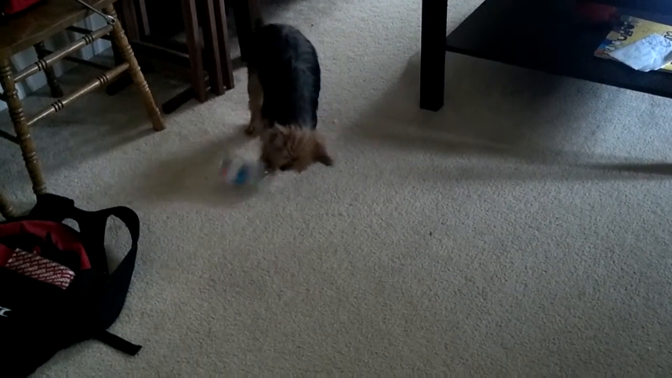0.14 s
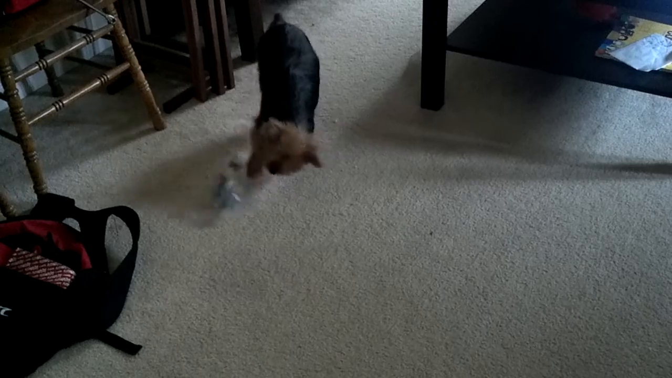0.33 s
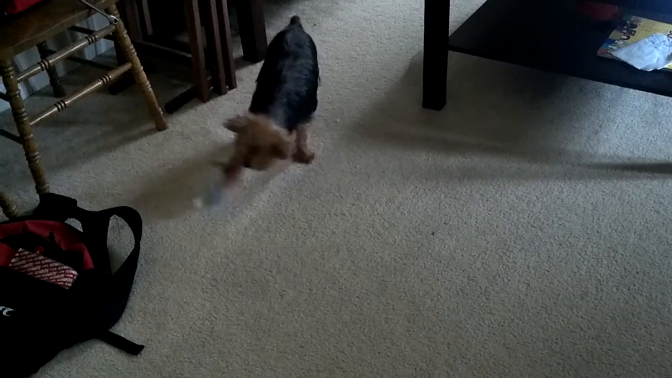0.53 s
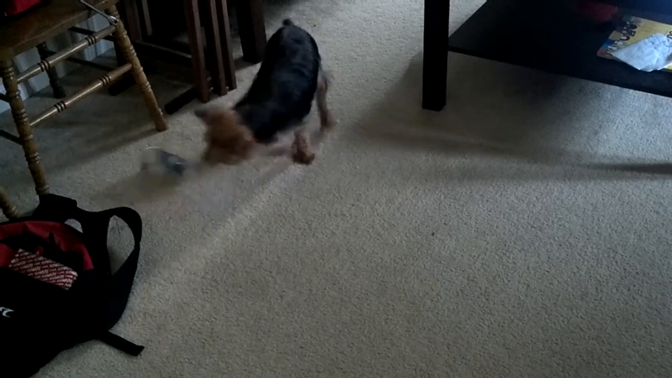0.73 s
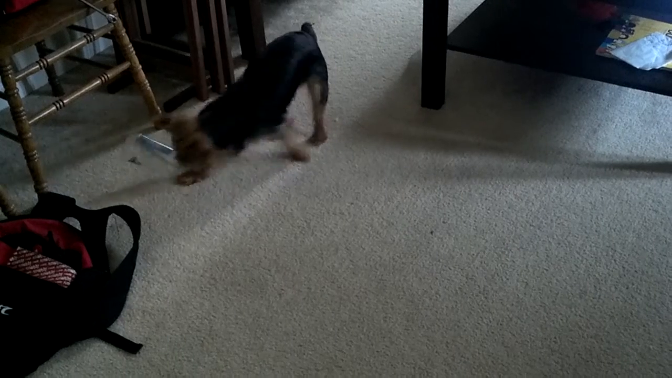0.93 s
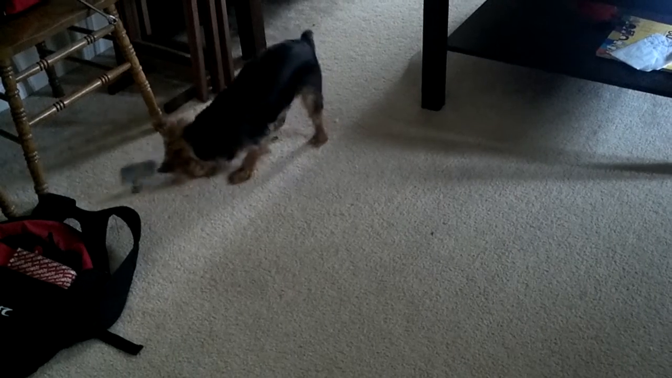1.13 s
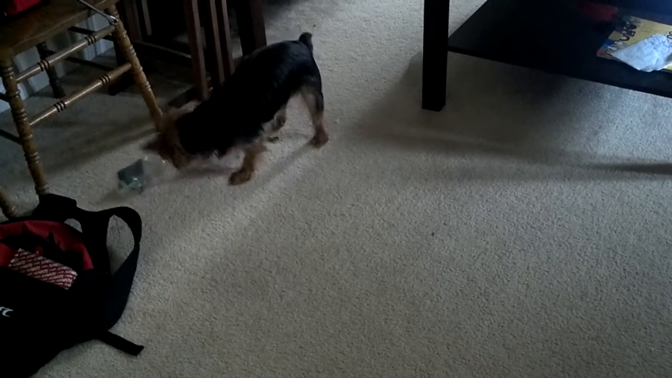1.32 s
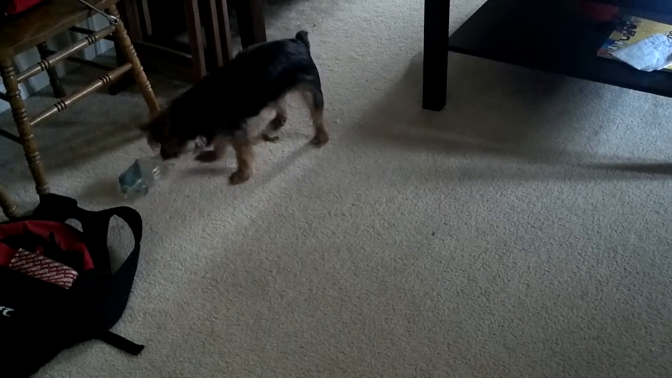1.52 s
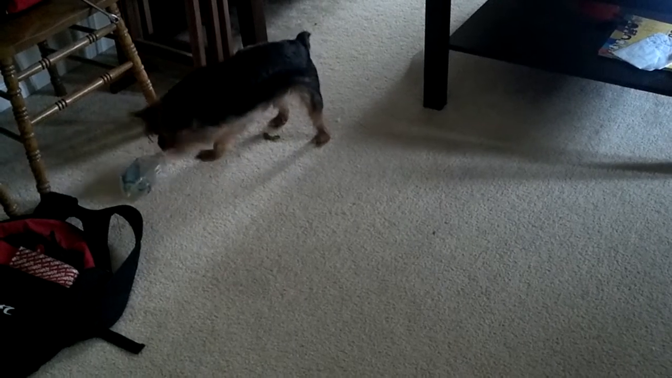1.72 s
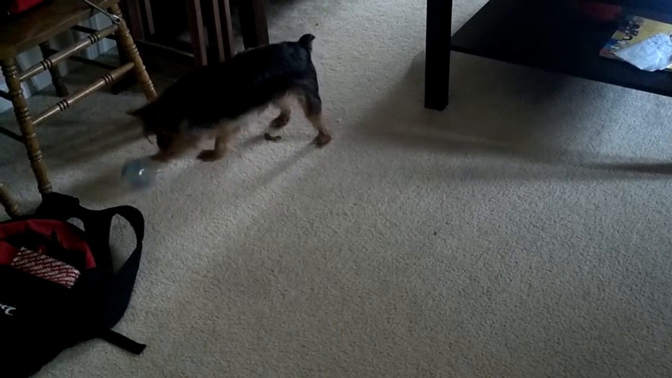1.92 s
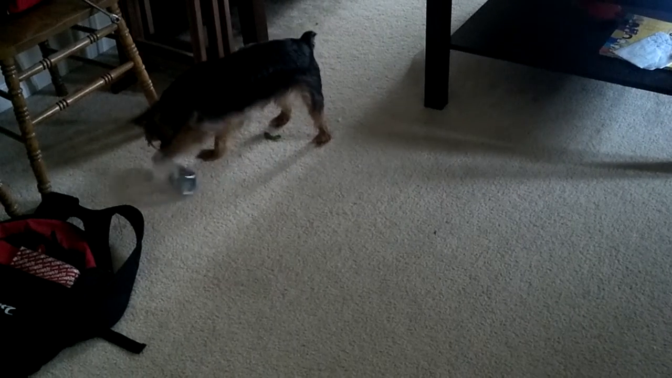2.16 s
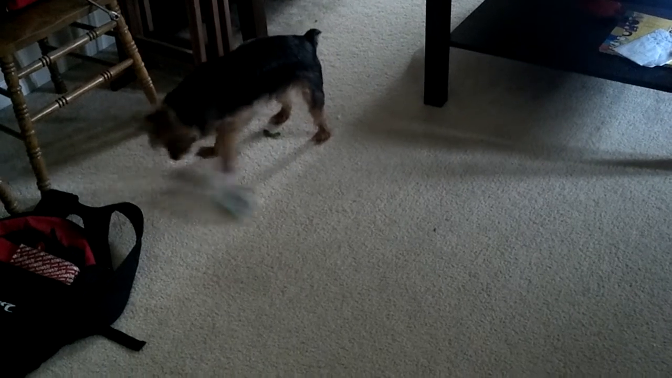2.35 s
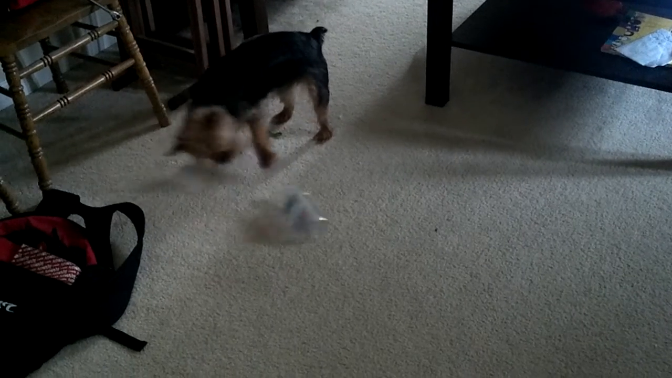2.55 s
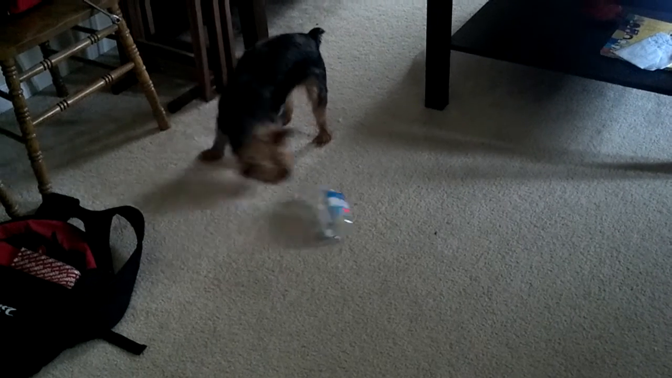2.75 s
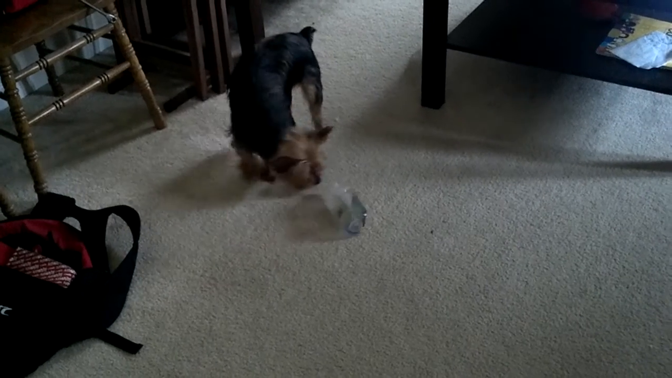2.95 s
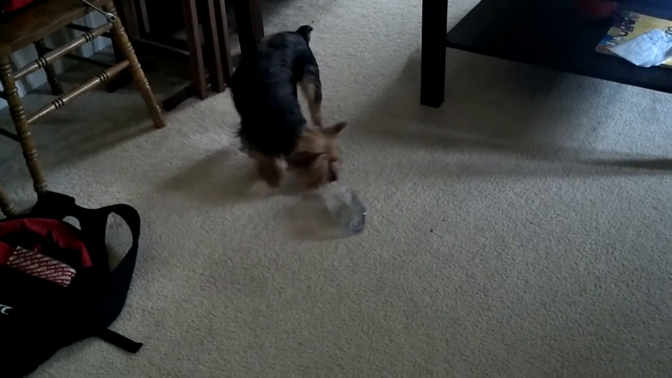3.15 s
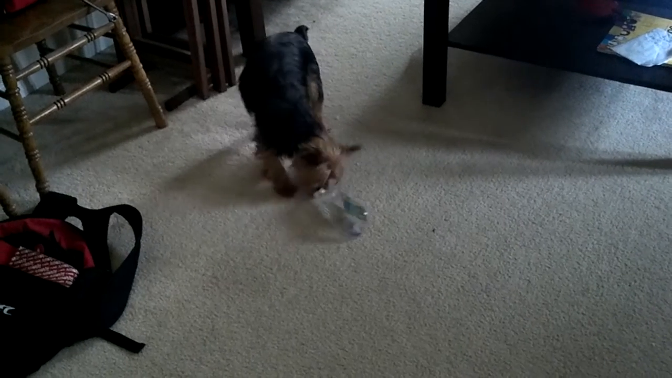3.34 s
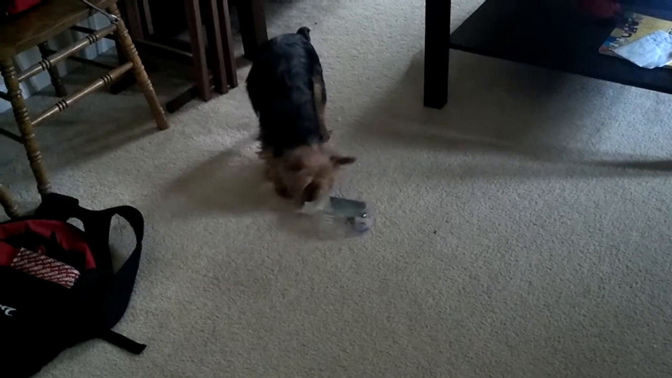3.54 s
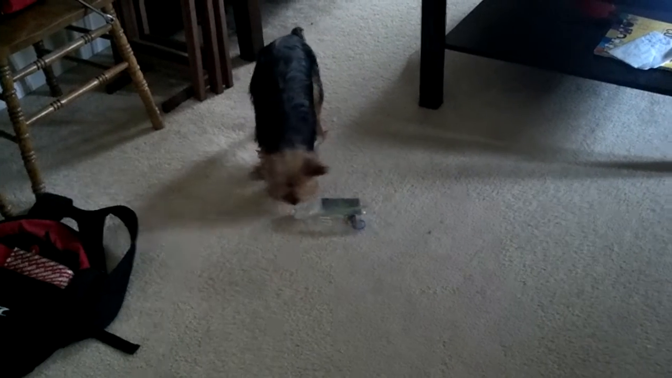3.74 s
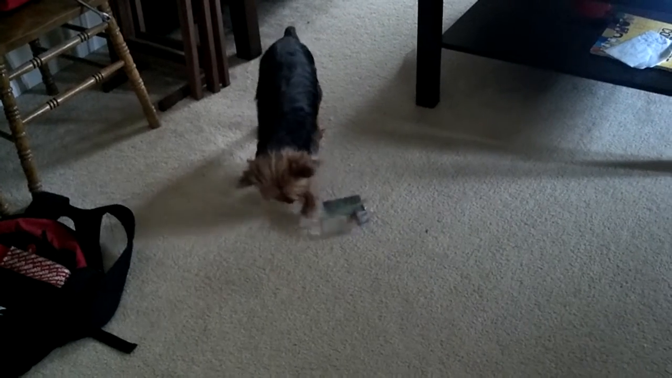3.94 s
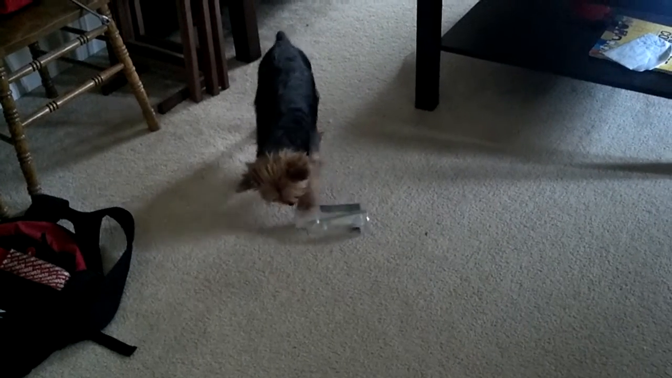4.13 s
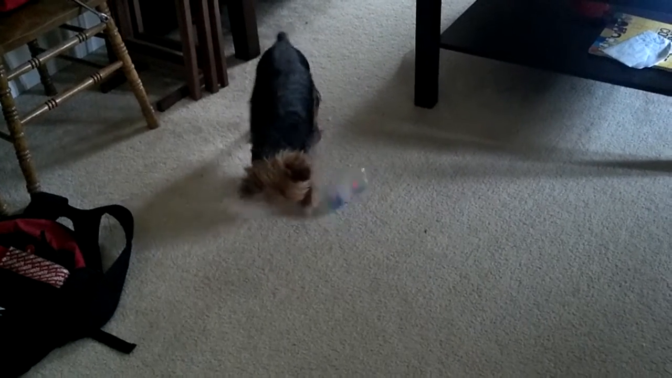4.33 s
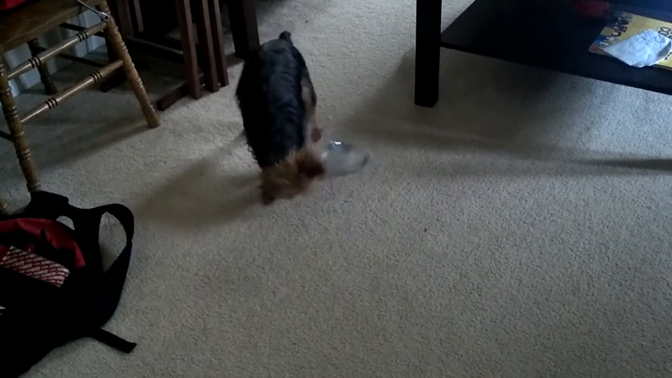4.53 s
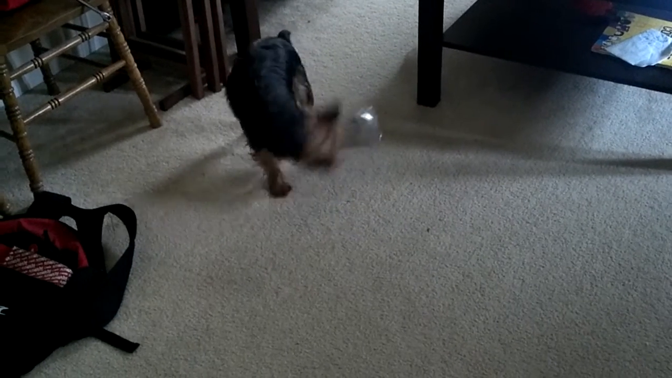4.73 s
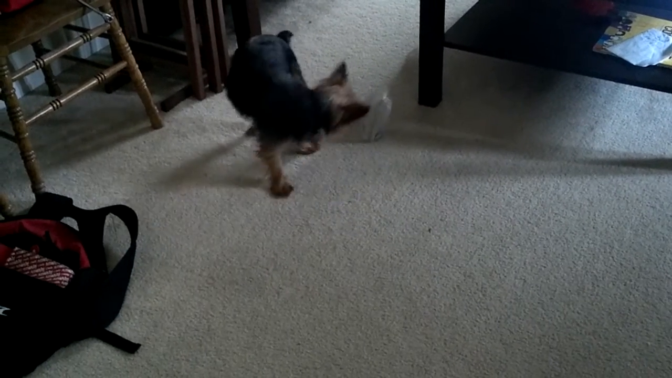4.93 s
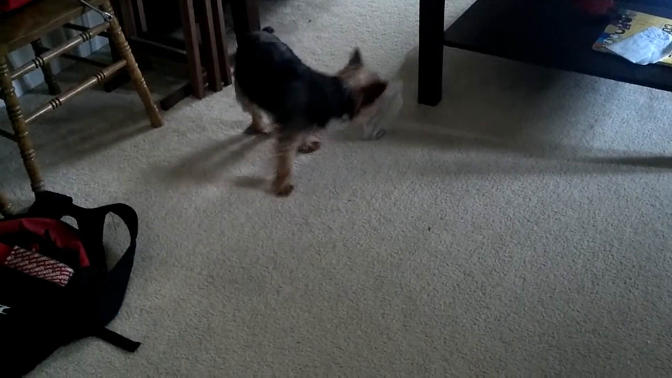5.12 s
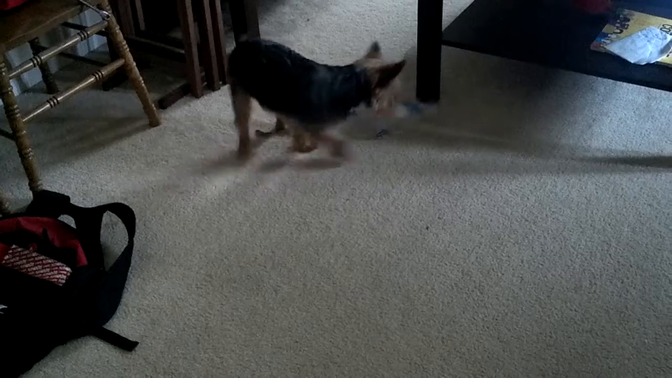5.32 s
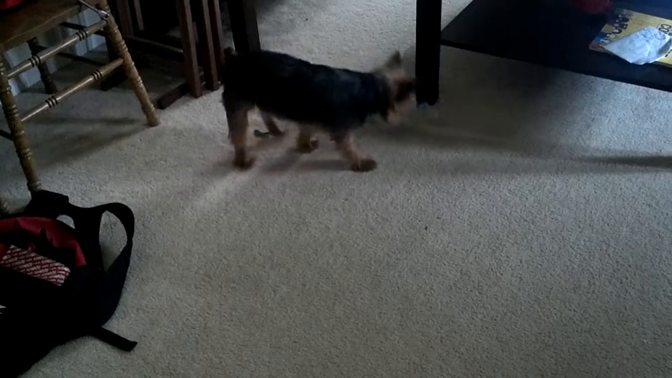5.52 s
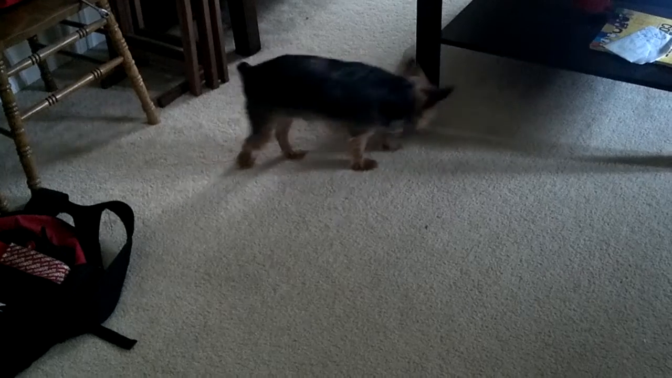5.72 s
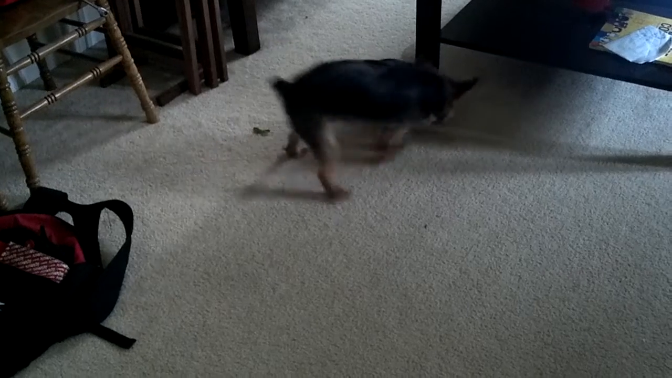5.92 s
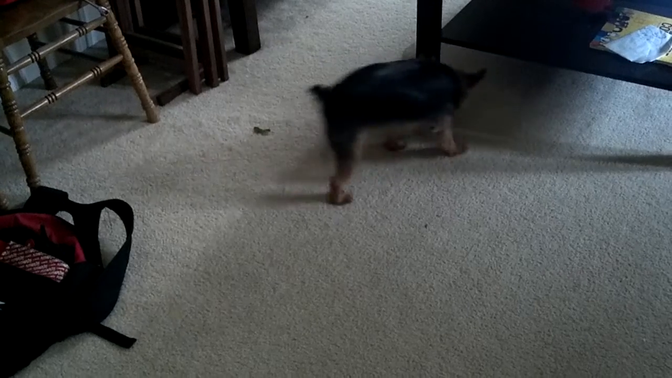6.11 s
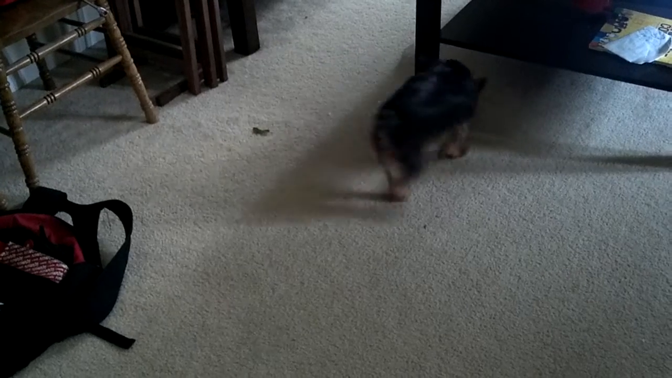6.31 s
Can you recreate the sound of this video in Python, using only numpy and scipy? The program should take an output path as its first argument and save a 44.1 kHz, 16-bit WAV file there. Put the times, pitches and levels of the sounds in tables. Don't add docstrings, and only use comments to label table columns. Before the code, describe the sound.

An empty plastic bottle is squeezed, knocked and shoved across carpet in irregular bouts: brittle crackling, hard clicks, short hollow booms and brief film-like label rustle. Small metal tags chink faintly, once brightly near the end. The strongest bouts fall in the first two and a half seconds and just after four. Small indoor room, short reverberation, nearby wide stereo microphones with hiss and motor whine.

```python
import sys
import numpy as np
from scipy import signal
from scipy.fft import rfft, irfft, next_fast_len
from scipy.io import wavfile
from scipy.ndimage import uniform_filter1d

SR = 44100
rng = np.random.default_rng(int(sys.argv[2]) if len(sys.argv) > 2 else 0)


def to_wav(s):
    ch = np.atleast_2d(s).T
    pcm = np.round(np.clip(ch, -1, 1) * 32767)
    wavfile.write(sys.argv[1], SR, pcm.astype(np.int16))


def undo_db(level):
    steps = np.asarray(level, float) / 20
    return 10 ** steps


N = 280455

# frequency in Hz, level in dB, t60 in s.
BODY_MODES = [(337, -3, 0.05), (388.5, 10, 0.12), (564.4, 4.5, 0.11), (630, 2, 0.1), (674, 7, 0.05),
              (796.3, 14.5, 0.033)]
# frequency in Hz, level in dB, t60 in s.
PANEL_MODES = [(1146, -10, 0.062), (1430, -69, 0.075), (1617, -3, 0.044), (1915, -16, 0.07),
               (2520, -0.5, 0.032), (3127, -1, 0.013), (4450, 15, 0.00046)]
# frequency in Hz, level in dB.
WALL_DB = [(500, -16.5), (1050, 5.5), (1600, 8), (2500, 10.5), (3500, 1.5), (4800, -4), (7000, -27.5)]
# frequency in Hz, level in dB.
CRACK_DB = [(2500, 5.5), (4200, 2), (6500, 12), (9000, 2), (12000, 0), (16000, -0.5)]


def evened(x):
    return x / np.sqrt(np.mean(x ** 2) + 1e-20)


def peak_one(x):
    return x / abs(x).max()


def read(points, hz):
    f, value = np.transpose(points)
    return np.interp(np.log(hz + 1), np.log(f + 1), value)


def add(mix, s, sound):
    part = mix[round(s * SR):][:len(sound)]
    part += sound[:len(part)]


def coloured(x, points):
    size = next_fast_len(x.shape[-1])
    gain = undo_db(read(points, np.fft.rfftfreq(size, 1 / SR)))
    return irfft(rfft(x, size) * gain, size)[..., :x.shape[-1]]


def ring(modes, t, jitter_db=0., detune=1.):
    hz, db, t60 = np.transpose(modes)[..., None]
    decay = undo_db(db + jitter_db - 60 * t / t60)
    return (decay * np.sin(2 * np.pi * hz * detune * t)).sum(0)


def swing_up(t, rise_s):
    return 1 - np.exp(-t / rise_s)


def ports(common, differing):
    return np.array([common + differing, common - differing])


def background():
    # frequency in Hz, density in dB per Hz.
    common_db = [(30, -88), (60, -87.5), (110, -77.5), (170, -83), (370, -85.5), (540, -90.5),
                 (800, -102.5), (1500, -101), (3300, -105), (5000, -109), (7000, -106), (16000, -107)]
    # frequency in Hz, density in dB per Hz.
    differing_db = [(30, -104), (60, -97), (120, -89), (370, -90.5), (540, -95), (800, -97), (1500, -102),
                    (3300, -105), (5000, -109), (7000, -106), (16000, -106)]
    # time in s, frequency in Hz.
    whine_hz = [(0, 3035), (3, 3070), (5, 3125), (6.36, 3130)]
    # multiple of the pitch, level in dB.
    whine_db = [(1, -66.5), (2, -68), (3, -57.5)]
    # frequency in Hz, level in dB.
    hum = [(120, -56), (6900, -79.5), (9860, -118)]
    # start in s, frequency in Hz, level in dB.
    far_whistle = (6.19, 1400, -74)
    t = np.arange(N) / SR
    noise = rng.standard_normal((2, N)) * np.sqrt(SR / 2)
    out = ports(coloured(noise[0], common_db), coloured(noise[1], differing_db))
    flutter, swell = uniform_filter1d(uniform_filter1d(rng.standard_normal((2, N)), size=40), size=40)
    turns = np.cumsum(np.interp(t, *np.transpose(whine_hz)) + 55 * evened(flutter)) / SR
    for multiple, db in whine_db:
        tone = (1 + 0.23 * evened(swell)) * np.cos(2 * np.pi * round(multiple) * turns)
        out += undo_db(db) * tone * np.array([[1], [.25]])
    for hz, db in hum:
        out += undo_db(db) * np.sin(2 * np.pi * hz * t)
    s, hz, db = far_whistle
    level = undo_db(db) * np.clip((t - s) / 0.034, 0, 1) * (1 + 0.49 * np.sin(2 * np.pi * 14 * t))
    return out + level * np.sin(2 * np.pi * hz * t)


def free_mode_hz(s):
    # time in s, free mode in Hz.
    grip = [(0, 507), (0.21, 730), (0.33, 563), (0.47, 820), (0.6, 493), (0.86, 660), (1.3, 750),
            (1.95, 626), (2.13, 596), (2.18, 330), (2.24, 600), (2.27, 380), (2.31, 791), (2.44, 572),
            (2.57, 605), (2.62, 680), (2.9, 640), (3.9, 718), (4.45, 761), (4.65, 630), (4.88, 740),
            (5.02, 400), (5.06, 635), (5.45, 740), (5.6, 685)]
    return np.interp(s, *np.transpose(grip))


def grip_db(mode_hz, free_hz):
    return -np.minimum(22 * abs(np.log2(mode_hz / free_hz)), 10.5)


def handling():
    # start in s, level in dB, fade in s,
    # wall relative level in dB, brightness in dB.
    shoves = [(0, -35.5, 0.12, 4.5, -2), (.49, -37, 0.27, -13, -8), (.6, -35.5, 1, -7.5, -21),
              (1.31, -38.5, 0.22, -2.5, -17), (2.14, -31, 0.28, -26, -28), (2.48, -35.5, 0.2, -2.5, -18),
              (2.58, -34, 0.27, -0.5, -16), (2.93, -41, 0.64, -12, -16), (3.98, -35, 0.15, -21, -6),
              (4.055, -35, 0.1, -19, -13), (4.32, -30, 0.41, -8, -14.5), (4.62, -30, 0.071, -6, -18),
              (5.58, -47, 0.91, -3, -23)]
    # top in s, level in dB, swell and fade in s,
    # wall relative level in dB, brightness in dB.
    squeezes = [(0.33, -40, 0.18, 0.5, -12), (.9, -31, 0.045, -1, -14), (1.08, -40, 0.032, -2.5, -13),
                (1.188, -38.5, 0.13, -2, -9.5), (1.86, -40, 0.033, -21, -7.5), (1.99, -41.5, 0.14, -2, -3),
                (2.208, -36, 0.12, -.6, -9.5), (2.35, -40, 0.31, -1, -12), (3.87, -62, 0.35, -2, -0.5),
                (4.22, -35.5, 0.12, 0.5, -13), (4.77, -47.5, 0.85, 0, -9), (2.01, -42.5, 0.05, 7, -3),
                (0.587, -29.5, 0.062, 0, -12), (5.62, -38, 0.05, -2, -28), (5.81, -51.5, 0.12, 4, -17),
                (3.04, -59, 0.043, -1, -1)]
    fade_speed = (1.01, 1.05, 1.1, 1.3)
    # body, panels, crackle, hiss in dB.
    rest_db = (-70, -83, -73, -76.5)
    t = np.arange(0, N / SR + .01, .002)
    speed = np.array(fade_speed)[:, None]
    power = undo_db(np.array(rest_db)[:, None] + 0 * t) ** 2
    for rows, sudden in ((shoves, True), (squeezes, False)):
        for s, db, fade_s, wall_db, bright_db in rows:
            rise_s = 0.016 if sudden else fade_s
            away = np.where(t < s, (s - t) / rise_s, (t - s) / fade_s)
            top_db = db + np.array([[0], [wall_db], [bright_db], [4.5 + 3.1 * bright_db]])
            power = power + undo_db(top_db - np.minimum(26.5 * speed * away, 200)) ** 2
    return [np.interp(np.arange(N) / SR, t, np.sqrt(p)) for p in power]


def crinkle():
    body, panels, fine, hiss = handling()
    chance, size, noise = rng.random((3, N)), rng.exponential(1, (3, N)), rng.standard_normal((3, N))
    slips_per_s = np.array([[700], [900], [1500]])
    slips = (chance < slips_per_s / SR) * undo_db(3.4 * np.minimum(size, 4)) * np.sign(noise)
    t = np.arange(8000) / SR
    free_hz = free_mode_hz(np.arange(N) / SR)
    low = np.zeros(N)
    for mode in BODY_MODES:
        low += signal.oaconvolve(slips[0] * undo_db(grip_db(mode[0], free_hz)), ring([mode], t))[:N]
    rub = slips[1] + .5 * slips[0] + 0.14 * noise[1]
    panel = evened(signal.oaconvolve(rub, ring(PANEL_MODES, t))[:N])
    mid = evened(0.067 * panel + evened(coloured(rub, WALL_DB)))
    top = evened(coloured(slips[2] + 0.68 * slips[1] + 0.9 * noise[2], CRACK_DB))
    air = evened(coloured(noise[0] + 1.3 * slips[2], [(6000, -15), (9500, -10.0), (16000, -23.0)]))
    out = undo_db(-7.5) * body * evened(low) + undo_db(-9.5) * panels * mid
    return out + undo_db(-5.5) * fine * top + undo_db(1) * hiss * air


def pops():
    # start in s, level in dB, panel in Hz, hollow relative level in dB, hollow mode in Hz.
    pop_rows = [(0.012, -38, 1580, 0, 384), (0.030, -37, 1210, -3, 350), (0.2164, -41, 1570, -6, 815),
                (0.334, -40.5, 1000, 8, 619), (0.5157, -28, 1670, -11, 706), (0.5751, -25, 1780, -17, 600),
                (0.598, -27.5, 1550, 0, 398), (0.798, -37, 1600, -8, 694), (0.810, -52, 1620, -5, 800),
                (0.878, -31, 1660, -5, 600), (0.8949, -26, 1050, -10, 594), (0.907, -31, 1100, -5, 521),
                (1.1388, -34.5, 1690, -2.5, 680), (1.172, -37, 1590, -5, 385), (1.207, -40.5, 1210, 2, 514),
                (2.001, -38, 1600, -19, 580), (2.009, -29, 1580, -25, 610), (2.018, -31.5, 1575, -18, 720),
                (2.035, -43, 1660, -12, 600), (2.156, -32, 1570, -5, 407), (2.222, -30, 1560, -2, 660),
                (2.268, -42.5, 1200, 8.5, 384), (2.4763, -24, 1620, -4, 590), (2.512, -40, 1500, -1, 580),
                (2.528, -45, 1700, 5, 583), (2.5506, -37.5, 1650, 3, 627), (2.597, -31.5, 1300, 1.5, 692),
                (2.652, -29.5, 1570, -5.5, 381), (2.8794, -41, 1400, -9, 620),
                (3.9749, -33, 1650, -20, 803), (4.2937, -32, 1510, 5.5, 778),
                (4.5686, -35, 1360, -1.5, 688), (4.8435, -39, 1600, 0.5, 640), (4.872, -41, 1120, -3, 814),
                (5.030, -40, 1710, 6, 637), (5.1283, -48.5, 1250, -5, 606), (5.7369, -42, 1210, -4, 760),
                (5.8113, -47, 1440, -10, 645), (4.122, -40, 1510, 4, 389), (1.005, -48.5, 1030, 7.5, 379)]
    pop_t60 = (.018, 0.057, 0.0072)
    out, t = np.zeros(N), np.arange(4000) / SR
    panel_t60, hollow_t60, crack_t60 = pop_t60
    grit = rng.standard_normal((len(pop_rows), len(t)))
    for (s, db, panel_hz, hollow_db, hollow_hz), noise in zip(pop_rows, grit):
        crack = (coloured(noise, CRACK_DB) + coloured(noise, WALL_DB)) * undo_db(-60 * t / crack_t60)
        hollow = ring([(hollow_hz, hollow_db, hollow_t60)], t) * swing_up(t, 0.0023)
        panel = ring([(panel_hz, 0, panel_t60)], t)
        add(out, s, undo_db(db) * ((panel + undo_db(-6.5) * peak_one(crack)) * swing_up(t, 0.00077) + hollow))
    return out


def buckles(rows, click_t60, rise_s, tail):
    out, t = np.zeros(N), np.arange(5000) / SR
    luck = rng.standard_normal((len(rows), 2, 13, 1))
    grit = rng.standard_normal((len(rows), 2, 2048))
    short_t = t[:2048]
    burst = undo_db(-60 * short_t / click_t60) + tail * undo_db(-60 * short_t / 0.037)
    burst *= swing_up(short_t, rise_s)
    body_hz = np.array(BODY_MODES)[:, :1]
    for (s, db, boom_db, crack_db, boom_hz, panel_hz), (vary, tune), noise in zip(rows, luck, grit):
        boom = ring(BODY_MODES, t, 3 * vary[:6] + grip_db(body_hz, boom_hz), 1 + 0.017 * tune[:6])
        boom += ring([(boom_hz, 3, .075)], t)
        boom *= swing_up(t, 0.003)
        panel = ring(PANEL_MODES, t, 4 * vary[6:], 1 + 0.05 * tune[6:]) + ring([(panel_hz, 4, .025)], t)
        add(out, s, undo_db(db - 2.0) * peak_one(panel * swing_up(t, rise_s)))
        add(out, s, undo_db(db + boom_db - 2.0) * peak_one(boom))
        add(out, s, undo_db(db - 0.5) * peak_one(coloured(noise[0], WALL_DB) * burst))
        add(out, s, undo_db(db + crack_db + 5.5) * peak_one(coloured(noise[1], CRACK_DB) * burst))
    return out


def snaps():
    # start in s, level in dB, boom relative
    # level in dB, crack relative level in dB.
    more_snap_rows = [(0.129, -39.5, -23, -5), (0.2072, -32.5, -5, -8), (0.353, -49, 8, -16),
                      (0.804, -45, -7, -23), (1.001, -67, 0, 12), (1.061, -39.5, -17, -7),
                      (1.1044, -43.5, 0.5, -3), (1.205, -44, -5, -25), (1.8412, -35.5, -6.5, -19),
                      (1.9346, -36.5, -7.5, -5), (2.204, -26.5, -17, -6.5), (2.324, -44, 14, -10),
                      (2.7144, -39.5, -2, 0), (2.9312, -32, -6.5, -12), (3.031, -33, -21, -13),
                      (3.212, -41.5, -31, -3), (3.3094, -46.5, -6, -14.5), (3.8925, -38, -10, -4),
                      (3.936, -40, -6, -18), (4.3822, -31.5, -25, 3.5), (4.879, -38.5, -11, 1),
                      (5.0161, -34, -7.5, -8), (5.4401, -58, 18.5, -6), (5.7752, -51, 3, -11),
                      (5.1575, -53, -27, 11), (4.6197, -28.5, -5, -2)]
    # start in s, level in dB, boom relative level in dB, boom in Hz, panel in Hz.
    dent_rows = [(0.1505, -35.5, -12, 620, 1500), (0.2438, -33, -11, 596, 1440),
                 (0.2868, -37.5, -10, 630, 1700), (0.5023, -33, -1, 760, 1610),
                 (0.5223, -25, -5.5, 696, 1650), (0.5854, -22.5, -7, 432, 1120),
                 (0.6609, -33.5, -5, 540, 1600), (0.9018, -38, -24, 640, 1090),
                 (1.1276, -34, -31, 630, 1500), (1.1493, -30, -3.5, 356, 1585),
                 (1.3907, -38, -7, 560, 1810), (2.1764, -28, 0, 292, 1330), (2.4751, -30.5, -4, 574, 1665),
                 (2.6327, -34, -3, 630, 1590), (2.9773, -34.5, -29, 557, 1520),
                 (3.0716, -34, -17, 534, 1815), (3.968, -34, -7.5, 800, 1800),
                 (4.2416, -31.5, 3, 765, 1640), (4.3294, -30, -13, 800, 1460),
                 (4.4752, -32.5, 5.5, 790, 1300), (4.6497, -50, -2, 620, 1500),
                 (4.787, -41.5, 3.5, 750, 1840), (5.5769, -30.5, -2.5, 644, 1550),
                 (5.7132, -42.5, -0.5, 756, 1230)]
    # start in s, level in dB, boom relative level in dB,
    # crack relative level in dB, panel in Hz.
    snap_rows = [(0.258, -32.5, -28, -1, 1750), (0.3138, -32, -0.5, -4, 1720),
                 (0.472, -19, -14, -10.5, 1430), (0.858, -31.5, -20, -3.5, 1610),
                 (1.2984, -24.5, -11, -9.5, 1670), (1.9636, -26.5, -33, 2.5, 1590),
                 (1.9812, -31, -20, -18, 1150), (1.993, -29.5, -13, -1, 1530),
                 (2.1338, -27, -4.5, -19, 900), (2.3091, -21, -15, -6, 1610), (2.4611, -27.5, -5, -9, 1610),
                 (2.5752, -21.5, -6, -13, 1570), (2.8953, -29, -12, -14, 1370),
                 (3.8512, -30, -24, -5, 1600), (3.981, -24, -10.5, -0.5, 1990),
                 (4.043, -20, -10.5, -8, 1510), (4.164, -25.5, -9.5, -10, 1330),
                 (4.2091, -22, -3.5, -10, 1650), (4.309, -20, 2, -10.5, 1510),
                 (4.3668, -23.5, 0, -11, 1680), (4.4423, -22.5, -11, -33, 1580),
                 (4.608, -22.5, -15, -3.5, 1630), (4.7195, -30.5, -34, -8, 1530),
                 (5.561, -33.5, 1.5, -9, 1670)]
    sharp = [(s, db, boom, crack, free_mode_hz(s), hz) for s, db, boom, crack, hz in snap_rows]
    sharp += [(*row, free_mode_hz(row[0]), 1614) for row in more_snap_rows]
    soft = [(s, db, boom, -12.5, low, hz) for s, db, boom, low, hz in dent_rows]
    quick = buckles(sharp, click_t60=.004, rise_s=.0001, tail=.27)
    return quick + undo_db(-2) * buckles(soft, click_t60=0.0023, rise_s=0.0021, tail=0.23)


def flicks():
    # start in s, level in dB, ring in Hz, sizzle relative level in dB.
    flick_rows = [(0.2199, -44, 6500, 0), (0.25, -33.5, 4000, 5), (0.3135, -37, 3940, 0),
                  (0.4708, -28, 3600, -6), (0.5011, -31, 4000, -9), (0.8679, -41, 6450, 0),
                  (1.0954, -44, 6500, 0), (1.934, -36, 3700, -2), (1.9616, -38, 6450, -3),
                  (2.2004, -31.5, 6500, 5), (2.3093, -19, 2620, -14), (2.3237, -42, 2620, -12),
                  (2.575, -41, 6600, -3), (3.802, -42, 6600, 2), (3.85, -40, 8900, -2),
                  (3.8916, -48, 9000, 0), (3.9812, -27, 9430, 5), (4.3291, -36, 3600, -2),
                  (4.3804, -32.5, 9000, 0), (4.6079, -30, 6600, 0), (1.849, -39, 6700, -1),
                  (2.168, -42, 6300, -10), (2.179, -31, 6500, -4), (0.519, -34, 3900, -8),
                  (0.528, -40, 3280, -8), (0.555, -32, 6500, -8), (0.4724, -29, 1730, -19),
                  (4.0436, -29, 3230, -14), (4.229, -36, 3200, -10), (4.7185, -27.5, 3970, -12),
                  (1.981, -33, 4000, -4), (3.9825, -21, 1950, -30)]
    flick_t60 = (0.0058, 0.0066)
    out, t = np.zeros(N), np.arange(800) / SR
    ring_t60, sizzle_t60 = flick_t60
    grit = rng.standard_normal((len(flick_rows), len(t)))
    for (s, db, hz, sizzle_db), noise in zip(flick_rows, grit):
        treble = coloured(noise, [(4000, -32), (9000, -3), (16000, -3)])
        sizzle = undo_db(db + sizzle_db) * peak_one(treble * undo_db(-60 * t / sizzle_t60))
        add(out, s, (ring([(hz, db, ring_t60)], t) + sizzle) * swing_up(t, 0.00012))
    return out


def sings():
    # start in s, level in dB, frequency in Hz, t60 in s.
    sing_rows = [(0.592, -31, 387, 0.11), (2.464, -37.5, 569, 0.32), (2.477, -37, 622.5, 0.2),
                 (2.505, -37, 563, 0.28), (2.568, -31, 630, 0.07), (4.618, -30.5, 389.6, 0.15),
                 (4.044, -38, 386, 0.12), (0.383, -47, 565, .22), (0.293, -44, 1015, .1),
                 (4.872, -42, 795, .2), (5.014, -43, 390, .08), (4.708, -46, 390, .25)]
    out, t = np.zeros(N), np.arange(12000) / SR
    for s, db, hz, t60 in sing_rows:
        add(out, s, ring([(hz, db, t60)], t) * swing_up(t, 0.0028))
    return out


def rustles():
    # start in s, level in dB, t60 in s.
    rustle_rows = [(0.506, -42, 0.23), (2.17, -49, 0.25), (4.612, -48, 0.21), (4.722, -46, 0.16),
                   (4.874, -51.5, 0.23)]
    # frequency in Hz, level in dB.
    label_db = [(2200, -28), (3200, -3), (3900, -0.5), (4600, -4), (6500, -21)]
    out, t = np.zeros(N), np.arange(10000) / SR
    grit, size = rng.standard_normal((2, len(rustle_rows), len(t)))
    for (s, db, t60), grains in zip(rustle_rows, grit * undo_db(4.6 * size)):
        add(out, s, evened(coloured(grains, label_db)) * undo_db(db - 60 * t / t60) * swing_up(t, 0.002))
    return out


def thuds():
    # start in s, level in dB, thud in Hz, bottle mode relative level in dB.
    thud_rows = [(0.585, -49.5, 163, 15), (0.675, -59.5, 179, 20.5), (0.891, -50, 152, 11),
                 (1.155, -50.5, 158, 9.5), (1.836, -52, 152, -10), (2.110, -37, 150, 3.5),
                 (2.168, -51, 176, -11), (2.24, -46.5, 139, 11.5), (2.312, -56, 162, 11),
                 (2.472, -56, 125, 16), (2.573, -47, 169, -5), (2.68, -47, 157, -12),
                 (3.979, -45.5, 159, 3), (4.207, -50, 134, -2), (4.609, -59, 132, 8),
                 (5.389, -46, 152.5, -3), (5.561, -52, 155, -9), (1.99, -49.5, 231, 5.5)]
    out, t = np.zeros(N), np.arange(8000) / SR
    for s, db, hz, upper_db in thud_rows:
        modes = [(hz, 0, .25), (301, upper_db - 0.5, .12)]
        add(out, s, undo_db(db + 3.5) * ring(modes, t) * swing_up(t, 0.011))
    return out


def tags():
    # start in s, level in dB, thick tag relative to thin in dB, split ring relative level in dB.
    chinks = [(1.095, -46, -3, -20.5), (1.1908, -47, 3.5, -25), (2.6236, -47, -4, -17),
              (2.774, -52, -5, -16), (2.861, -52, 3, -16), (3.806, -55, 5.5, -4), (3.9165, -49, -7, -25),
              (4.1054, -38.5, -3.5, -22), (5.159, -26, -12, -40.5)]
    # frequency in Hz, level in dB, t60 in s.
    thin_tag = [(14142, -8.5, .27), (14518, 2, .045), (15060, -22, .1), (13330, -24, .12),
                (11840, -24, .08)]
    thick_tag = [(6797, 0, .28), (6818, -7, .2), (6062, -10, .25), (9851, -17, .3), (5150, -18, .2)]
    split_ring = [(7820, 0, .45), (7886, 0, .45)]
    out, t = np.zeros(N), np.arange(16000) / SR
    luck = rng.standard_normal((len(chinks), 10, 1))
    for (s, db, thick_db, ring_db), vary in zip(chinks, luck):
        add(out, s, undo_db(db - 2) * peak_one(ring(thin_tag, t, 0.94 * vary[:5])))
        add(out, s, undo_db(db + thick_db - 4.0) * peak_one(ring(thick_tag, t, 3 * vary[5:])))
        add(out, s, undo_db(db + ring_db + 18) * peak_one(ring(split_ring, t)))
    return out


def room():
    # frequency in Hz, t60 in s.
    room_t60 = [(200, 0.24), (800, 0.37), (3000, 0.29), (10000, 0.21)]
    taps = np.zeros((2, SR // 2))
    at = np.arange(220, SR // 2 - 20, 20) + rng.integers(0, 20, (2, (SR // 2 - 221) // 20))
    np.put_along_axis(taps, at, rng.choice([-1., 1.], at.shape), 1)
    hz, t, z = signal.stft(taps, SR, nperseg=256)
    tail = signal.istft(z * undo_db(-60 * t / read(room_t60, hz)[:, None]), SR, nperseg=256)[1]
    differing = coloured(tail[1], [(200, -17.5), (600, -5), (1500, -3.5), (16000, 3.0)])
    tail = ports(tail[0], differing)
    return tail / np.linalg.norm(tail[0])


def reflected(x, tails):
    turn = 2 * np.pi * np.arange(N) / SR / .37
    shares = [np.sqrt(2 / 3) * np.cos(turn / 2 + k * np.pi / 3) for k in range(3)]
    return sum(signal.fftconvolve((x * share)[None], tail, axes=1)[:, :N]
               for share, tail in zip(shares, tails))


def scene():
    bottle, collar = snaps() + crinkle() + thuds(), tags()
    tails, floor = [room(), room(), room()], background()
    bottle += pops() + sings() + rustles() + flicks()
    bottle = coloured(bottle, [(40, -23), (110, -0.5)])
    bass = coloured(bottle, [(380, 0.5), (700, -19)])
    late_treble = np.roll(bottle - bass, 5)
    shaded = coloured(late_treble, [(400, -3.5), (3000, -22.0), (12000, -2.0)])
    direct = np.array([bottle, bass + shaded])
    direct += collar * undo_db([[0], [-4]])
    sent = coloured(bottle + undo_db(-5) * collar, [(300, 1.0), (900, -3.0), (2000, -4.5), (12000, -0.5)])
    return undo_db(2.5) * direct + reflected(sent, tails) + floor


def joint(x, under_db=-7, quiet_db=-82):
    hz, _, z = signal.stft(ports(*x) / 2, SR, nperseg=2048)
    power = uniform_filter1d(uniform_filter1d(abs(z) ** 2, size=9, axis=1), size=3, axis=2)
    level_db = 10 * np.log10(power + 1e-20)
    weak = (level_db - level_db[::-1] < under_db) & (level_db < quiet_db) & (hz[:, None] > 900)
    return ports(*signal.istft(z * ~weak, SR, nperseg=2048)[1][:, :N])


def roll_off(x):
    return signal.sosfilt(signal.butter(12, 16450, fs=SR, output="sos"), x)


def record(dry):
    late = np.pad(dry, ((0, 0), (17, 0)))[::-1, :N]
    wide = joint(dry - 1.05 * late)
    edge = signal.firwin(401, 15780, window=("kaiser", 3), fs=SR)
    return roll_off(signal.oaconvolve(wide, edge[None], "same"))


dry = scene()
out = record(dry)
to_wav(out)
```